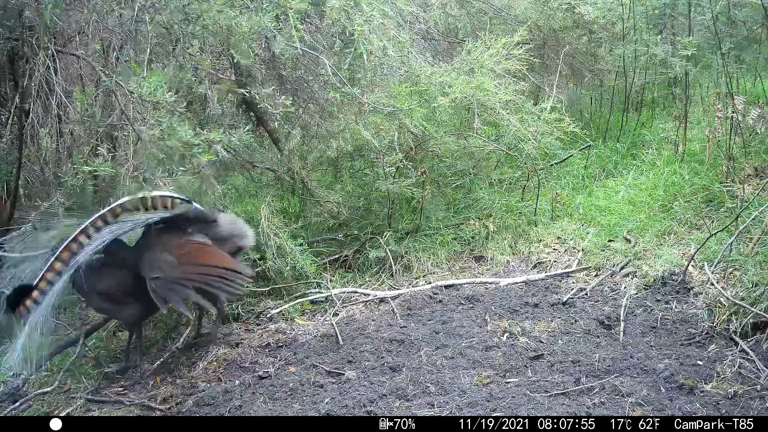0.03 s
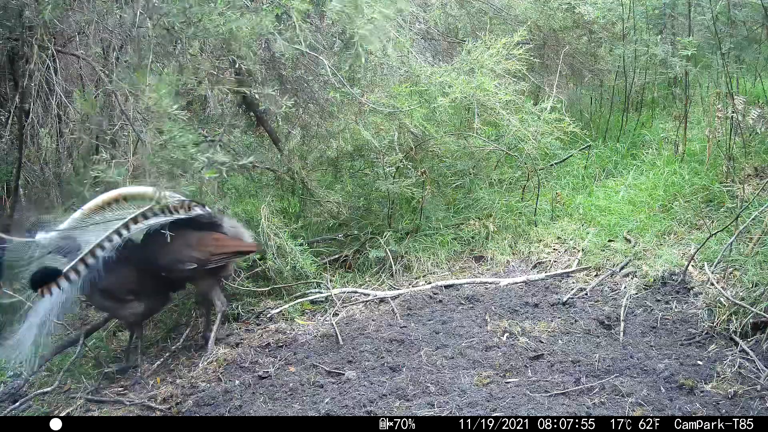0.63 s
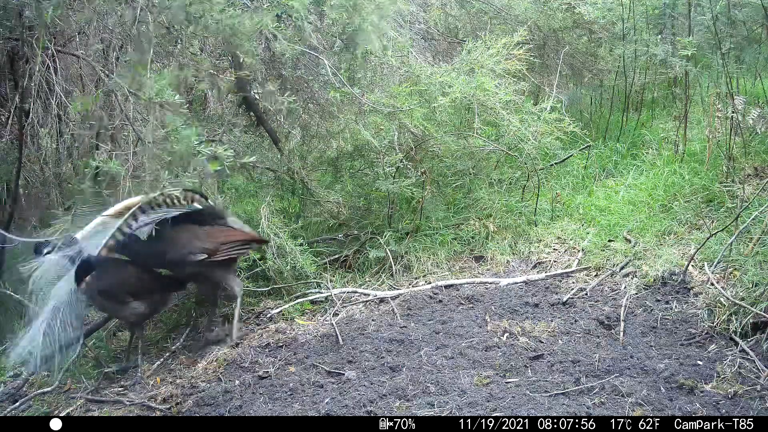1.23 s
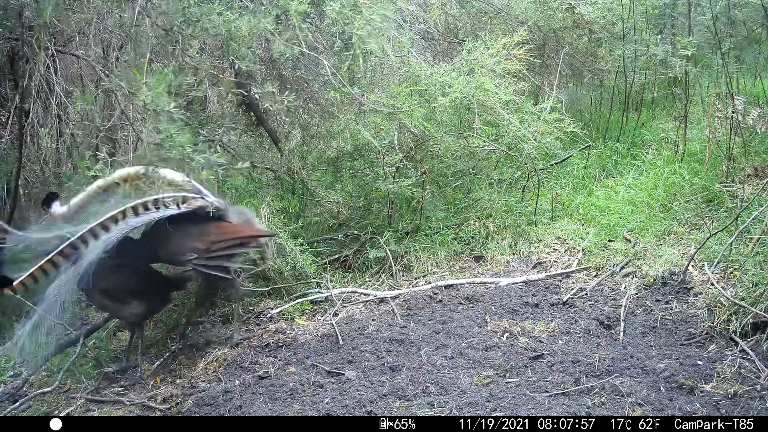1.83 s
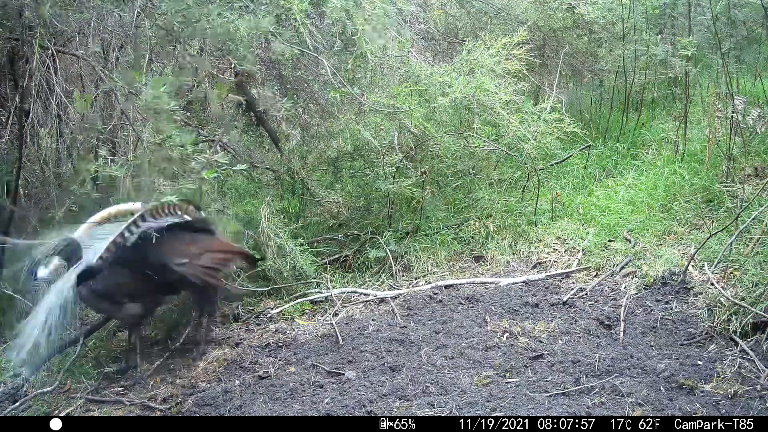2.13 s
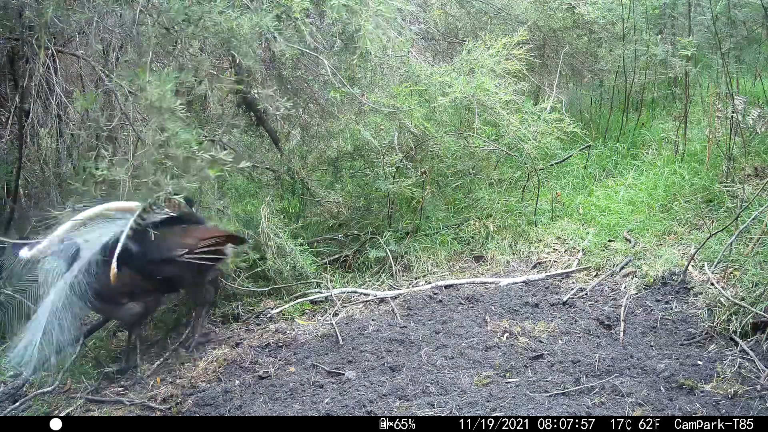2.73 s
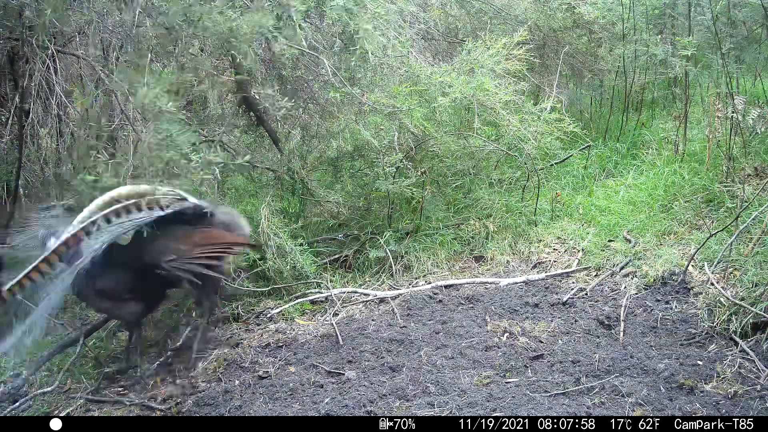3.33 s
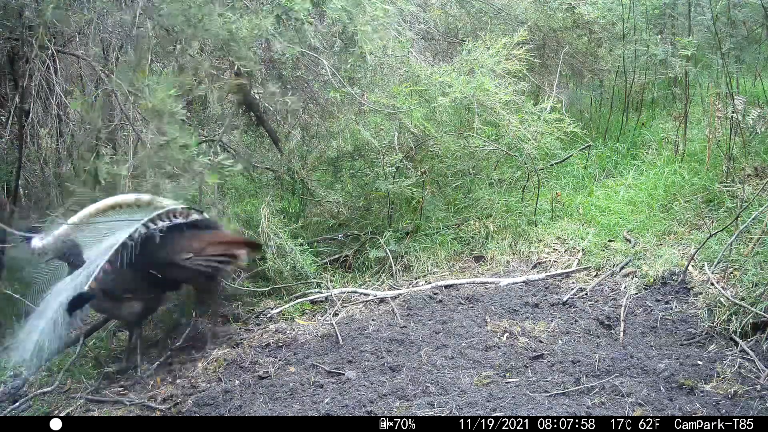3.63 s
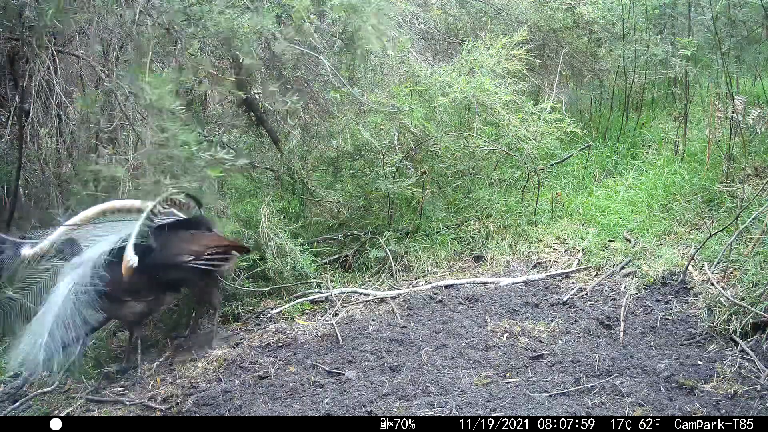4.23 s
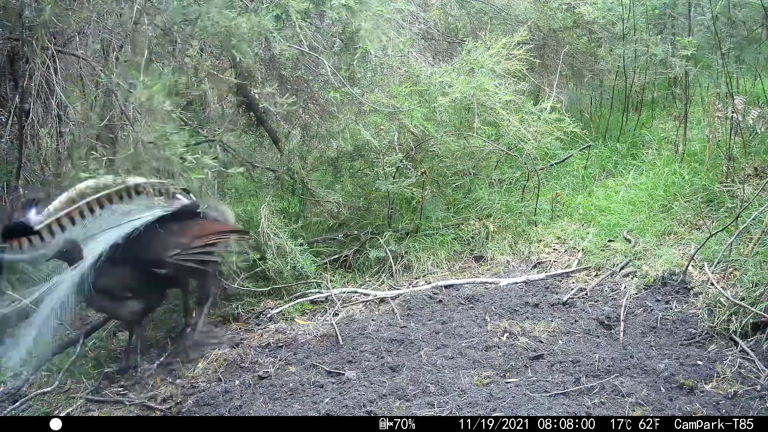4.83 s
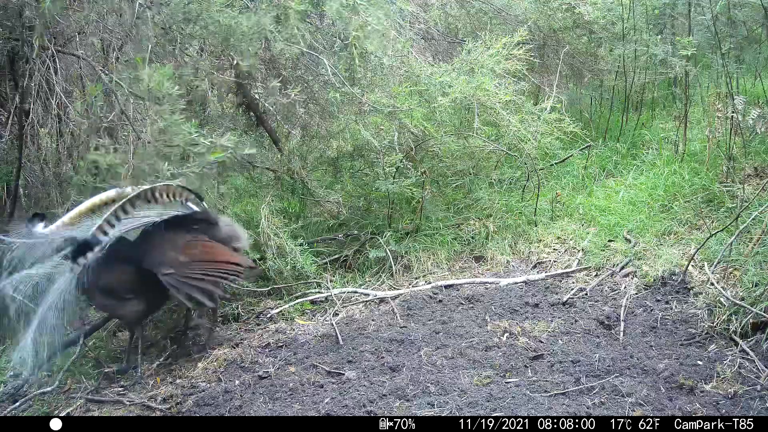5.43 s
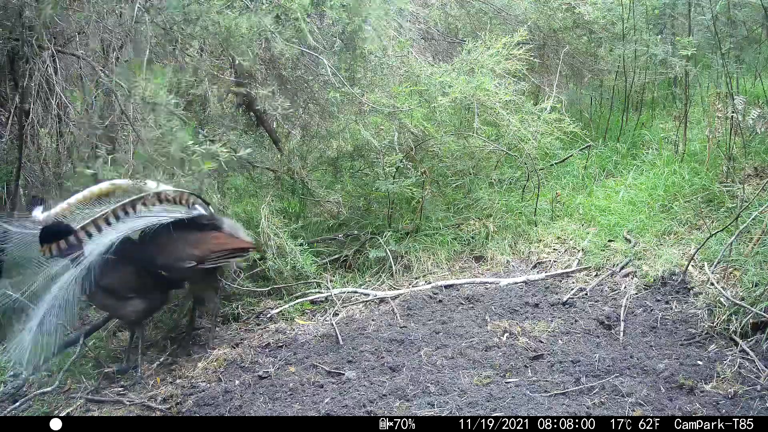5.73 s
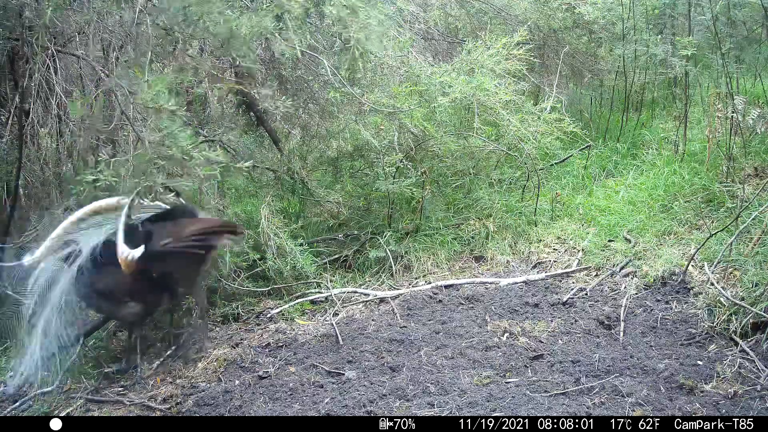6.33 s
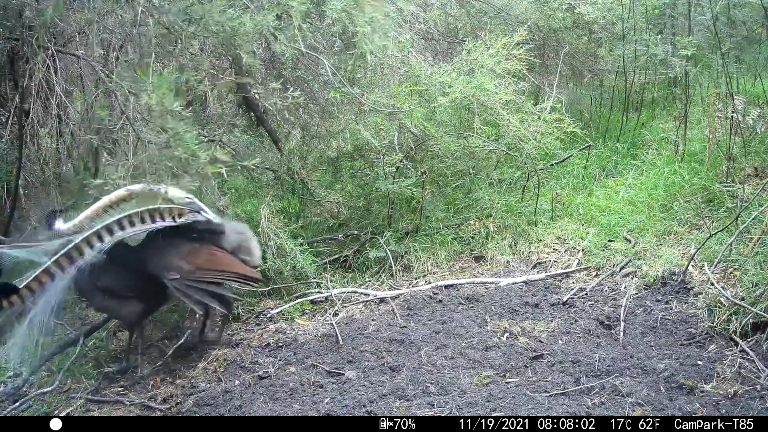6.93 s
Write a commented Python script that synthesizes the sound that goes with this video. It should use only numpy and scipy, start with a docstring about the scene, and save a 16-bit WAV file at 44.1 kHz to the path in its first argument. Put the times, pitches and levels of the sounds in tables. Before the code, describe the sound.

A lyrebird close by sings buzzing zaps, then alternates hollow knocks, dry clacks and whirrs with loud yelping trills in quiet scrub.

```python
"""A loud trill opens the scene, then five buzzing zaps: a lyrebird displays in scrub, close to a small
microphone. Both sides of its syrinx sound in a zap, a warbling high voice over a low whistle. It then
alternates knocks, dry clacks and whirrs (pulse trains filtered by the throat, all in one rhythm) with a
loud note-yelp-trill call; zaps and calls die away in a throbbing rasp. A small bird whistles further
off over faint air. Twigs and trunks scatter the song, and the loudest notes overload the microphone."""
import sys
import numpy as np
from scipy import signal
from scipy.fft import rfft, irfft
from scipy.io import wavfile
from scipy.ndimage import uniform_filter1d, minimum_filter1d

SR = 44100
rng = np.random.default_rng(int(sys.argv[2]) if len(sys.argv) > 2 else 0)


def to_wav(s):
    """Save 16-bit WAV."""
    ch = np.atleast_2d(s).T  # columns
    pcm = np.round(np.clip(ch, -1, 1) * 32767)  # PCM
    wavfile.write(sys.argv[1], SR, pcm.astype(np.int16))


N = 312228

# spectra of the background air and of the throat in each kind of sound: f/Hz, level/dB
AIR_COLOUR = [(20, -6.5), (40, -7.5), (100, -6), (200, -4.5), (450, -12), (900, -17), (2000, -20),
              (5000, -17.5), (8000, -22), (10000, -25.5), (14000, -28.5), (15500, -44.5)]
WHIRR_COLOUR = [(500, -18.5), (1250, -4.5), (2400, -24), (3500, -11.5), (4700, 5), (5800, 0), (7200, -6.5),
                (8300, -14.5), (9500, -35.5)]
CLACK_COLOUR = [(250, 33), (700, -25), (1250, 9), (1800, -6.5), (2600, -15), (3700, -1.5), (5600, -4),
                (7000, -12.5), (8300, -33), (10000, -47)]
KNOCK_COLOUR = [(150, -16), (260, -20), (700, 9), (1300, 11.5), (2200, 3), (3500, 5.5), (5300, 13.5),
                (6500, -19), (8000, -27.5), (10000, -40)]
RASP_COLOUR = [(1900, -17.5), (2600, -4.5), (3500, 2), (4400, 1.5), (5400, 0), (6500, -12.5), (8000, -16),
               (10000, -23), (14500, -27.5), (15500, -43.5)]
ZAP_COLOUR = [(2000, -19), (2800, -6), (3500, -5), (4100, 1), (5200, -2), (5900, 4.5), (6700, -2),
              (7500, -4.5), (9000, -23), (14500, -36)]
# whistles of the small bird: t/s, length/s, starting f/Hz, final f/Hz, level/dB
FAR_WHISTLES = [(1.859, 0.061, 4500, 2880, -37), (3.126, 0.054, 3150, 3040, -46),
                (3.445, 0.046, 2990, 2887, -49.5), (4.334, 0.083, 4500, 2900, -43),
                (5.976, 0.071, 4450, 2830, -42), (6.041, 0.094, 3380, 3005, -46.5)]
# phrases of a deep knock and a pair of clacks: knock t/s, pair t/s, knock level/dB, snap level/dB,
# clack level/dB, whirr level/dB, puff level/dB, drop from first to second puff/dB
PHRASES = [(1.9408, 2.023, -17, -12.5, -18.5, -30.5, -43.5, 6),
           (2.948, 3.061, -19, -16.5, -20.5, -33.5, -37.5, 3.5),
           (3.389, 3.505, -21.5, -30.5, -19, -33.5, -42.5, 8.5),
           (4.446, 4.557, -17, -14, -18, -30, -37, 2.5), (4.8858, 5.0008, -18, -15, -17, -29, -41, 5.5),
           (6.003, 6.1161, -18, -19, -17, -27.5, -37, 3), (6.444, 6.56, -19.5, -26, -15.5, -27, -46, 6)]
# puffs after a pair: t/s from its second clack, t60/s
PAIR_PUFFS = [(.035, .07), (.068, 0.12), (.114, .17)]
# whirrs round a pair: t/s from its first clack, length/s, relative level/dB
PAIR_WHIRRS = [(-.034, .024, 0), (.007, .016, -1), (0.034, .014, 1.5)]
# hollow resonances of the throat after a knock: f/Hz, level/dB, t60/s
THROAT_MODES = [(252, -16, 0.057), (487.6, -11.5, 0.056), (701, -12, 0.063), (1242, -11.5, .05)]
# zaps: t/s, crack level/dB, buzz level/dB, whistle level/dB
ZAPS = [(0.4513, -8, -3.5, -3), (.669, 1, 2.5, -0.5), (.889, 3.5, 2.5, -0.5), (1.1086, 2, 3.5, -0.5),
        (1.3288, 1.5, 3, -1)]
# high voice of a zap: t/s from its start, centre f/Hz, warble f/Hz, level/dB
ZAP_BUZZ = [(.001, 4642, 185, -15), (.005, 4360, 186.2, -12.5), (.018, 4167, 187.3, -16.5),
            (.035, 4050, 159.5, -23), (.06, 4000, 148, -26.5), (.1, 4030, 148, -29), (.118, 4250, 189, -26),
            (.135, 5190, 204, -33.5)]
# pitch contours of the parts of a zap and of a loud call: t/s within the part, f/Hz, level/dB
ZAP_CRACK = [(-.002, 915, -31), (-.0006, 1424, -17), (0, 2294, -4), (.0007, 4300, -4), (.0016, 5300, -38)]
ZAP_WHISTLE = [(.004, 1152, -19), (.02, 755, -21), (.035, 626.4, -34.5), (.06, 713, -26.5), (.09, 794, -28),
               (.11, 1049, -27), (.124, 1550, -16.5), (.134, 2300, -18.5), (.138, 2310, -72)]
CALL_NOTE = [(0, 1435, -31.5), (.002, 1442, -14.5), (.007, 1447, -9), (.014, 1486, -6), (.02, 1470, -8),
             (.023, 1437, -15.5), (.027, 1504, -33.5)]
CALL_YELP = [(-.005, 3010, -29), (-.003, 2996, -1.5), (-.0005, 3038, 6.5), (.0025, 2960, -9.5),
             (.005, 2816, -6.5), (.008, 3000, 0), (.0105, 3087, -10.5), (.013, 3090, -38)]
TRILL_PIP = [(-.0036, 2334, -28), (-.0018, 1974, -9.5), (0, 2140, 0.5), (.0014, 1950, -5.5),
             (.0028, 1540, -19), (.0039, 2030, -16.5), (.0065, 2150, -32.5)]
TRILL_SLUR = [(.006, 1640, -29), (.012, 1400, -24.5), (.022, 1192, -25), (.027, 1000, -44),
              (.031, 900, -78.5)]
# loud calls, the first already under way: yelp t/s, last pip t/s, pitch ratio, yelp level/dB,
# rasp level/dB
LOUD_CALLS = [(-.0367, 0.0686, 1, 3, -34.5), (2.3407, 2.4459, 1.013, 4.5, -34.5),
              (3.8251, 3.9264, 1, 3, -34), (5.3212, 5.4247, 1.016, 2, -33),
              (6.8779, 6.983, 1.009, 1.5, -36)]

LEAD_S, PAIR_GAP_S = .052, .0556  # from lead clack to knock; between the clacks of a pair


def undb(db):
    """Amplitude ratio of a level in decibels."""
    return 10 ** (np.asarray(db) / 20)


def clock(length):
    """Sample times over a length in seconds."""
    return np.arange(max(int(length * SR), 8)) / SR


def add(out, s, x):
    """Superposition: x adds to out from time s."""
    i = int(round(s * SR))
    x = x[max(-i, 0):max(N - i, 0)]
    out[max(i, 0):max(i, 0) + len(x)] += x


def curves(table):
    """Linear interpolation: sample times, then each column of a table."""
    s, *columns = np.transpose(table)
    t = s[0] + clock(s[-1] - s[0])
    return [t] + [np.interp(t, s, c) for c in columns]


def gain_at(hz, colour):
    """Frequency response of a spectrum (f/Hz, level/dB), interpolated in log frequency."""
    f, db = np.transpose(colour)
    return undb(np.interp(np.log(hz + 1), np.log(f), db))


def coloured(x, colour):
    """Linear filtering: the spectrum of x is multiplied by a frequency response."""
    return irfft(rfft(x) * gain_at(np.fft.rfftfreq(len(x), 1 / SR), colour), len(x))


def noise(colour, size):
    """Filtered Gaussian noise of rms 1."""
    x = coloured(rng.standard_normal(size), colour)
    return x / x.std()


def wander(t, rate):
    """Random modulation of spread near 1, with rate new values a second."""
    u = (t - t[0]) * rate
    points = rng.standard_normal(int(u[-1]) + 2)
    return 1.2 * np.interp(u, np.arange(len(points)), points)


def turn(hz):
    """Phase as the time integral of frequency."""
    return 2 * np.pi * np.cumsum(hz) / SR


def gate(t, edge):
    """Trapezoidal envelope with ramps of edge seconds."""
    return np.clip(np.minimum(t - t[0], t[-1] - t) / edge, 0, 1)


def tone(hz, overtones_db):
    """Periodic vibration of a membrane: a fundamental and its harmonics."""
    phase = turn(hz)
    overtones = sum(undb(db) * np.sin((k + 2) * phase) for k, db in enumerate(overtones_db))
    return np.sin(phase) + overtones


def add_note(out, s, shape, db, overtones_db, ratio=1, rough=.002, hiss_db=-70):
    """Frequency jitter roughens a note sung along a contour at time s; air hisses with it."""
    t, hz, level_db = curves(shape)
    voice = tone(hz * ratio * (1 + rough * wander(t, 2500)), overtones_db)
    hiss = undb(hiss_db) * noise([(1000, -25), (4000, -.5), (8000, -2.5), (14500, -7)], len(t))
    add(out, s + t[0], undb(db + level_db) * gate(t, .00024) * (voice + hiss))


def pulses(t, hz, colour, fade_db_s=0, fade_db_s_per_hz=0, smear=3.14, count=40):
    """Source and filter: the throat weights and delays the harmonics of syrinx pulses, smearing them."""
    k = np.arange(1, count + 1)[:, None]
    weight = gain_at(k * hz, colour) * (k * hz < SR / 4)
    lag = smear * np.cumsum(.5 * rng.standard_normal((count, 1)), axis=0)
    decay = undb(-t * (fade_db_s + fade_db_s_per_hz * k * hz))
    harmonics = weight * decay * np.sin(k * (turn(hz) - 1.4) + lag)
    return gate(t, .00036) * harmonics.sum(0) / weight.sum(0)


def air(db=-58):
    """Ambient noise: faint, broadband and slowly drifting in level."""
    return noise(AIR_COLOUR, N) * undb(db + 1.1 * wander(clock(8)[:N], 3.1))


def scrub(x, early_db=-25, early_t60=.076, late_db=-27, late_t60=.67):
    """Reverberation: twigs scatter the sound at once; trunks further off give a faint long tail."""
    t = clock(.87)
    colour = [(100, -7.5), (1400, 4), (2100, 7.5), (3000, 3.5), (6000, 7), (8400, 5),
              (10000, -1.5), (14000, -9.5)]
    response = 0
    for db, t60 in ((early_db, early_t60), (late_db, late_t60)):
        tail = noise(colour, len(t)) * undb(-60 * t / t60) * np.clip(t / .00083, 0, 1)
        response = response + undb(db) * tail / np.linalg.norm(tail)
    return x + signal.fftconvolve(x, response)[:N]


def small_bird(direct_db=-8, scattered_db=-7, t60=.23):
    """Scattering in the bushes smears the thin falling whistles of a distant bird."""
    direct = np.zeros(N)
    for s, length, from_hz, to_hz, db in FAR_WHISTLES:
        t = clock(length)
        hz = from_hz * (to_hz / from_hz) ** (t / length) * (1 + .02 * wander(t, 400))
        add(direct, s, undb(db) * gate(t, .015) * np.sin(turn(hz)))
    t = clock(.25)
    leaves = rng.standard_normal(len(t)) * undb(-60 * t / t60)
    scattered = signal.fftconvolve(direct, leaves / np.linalg.norm(leaves))[:N]
    return undb(direct_db) * direct + undb(scattered_db) * scattered


def puffs():
    """Exponentially decaying noise bursts follow each pair of clacks, their level dropping ever faster."""
    out = np.zeros(N)
    t = clock(.13)
    colour = [(400, -18.5), (1400, -3.5), (2500, -12.5), (3700, -3), (5100, -.5), (6500, -18),
              (9000, -27.5), (14000, -42.5)]
    for _, pair_s, *_, db, drop_db in PHRASES:
        for k, (after, t60) in enumerate(PAIR_PUFFS):
            envelope = undb(db - drop_db * k ** 2 - 60 * t / t60) * gate(t, .0015)
            add(out, pair_s + PAIR_GAP_S + after, envelope * noise(colour, len(t)))
    return out


def whirr(length, pulse_hz=550):
    """High formants turn a pulse train into a thin buzz; the pulse rate sags in the middle."""
    t = clock(length)
    hz = pulse_hz * (1 + .08 * np.cos(2 * np.pi * t / length) + .03 * wander(t, 150))
    buzz = pulses(t, hz, WHIRR_COLOUR) + undb(-27.5) * noise(WHIRR_COLOUR, len(t))
    pressure_loss = undb(-4 * t / length)
    return pressure_loss * gate(t, .0014) * buzz


def whirrs(lead_delay_s=.006, lead_length_s=.035, lead_db=-4):
    """Pulse trains fill the gaps: a long soft one before each knock, three short ones round the pair."""
    out = np.zeros(N)
    for knock_s, pair_s, *_, db, _, _ in PHRASES:
        add(out, knock_s - LEAD_S + lead_delay_s, undb(db + lead_db) * whirr(lead_length_s))
        for after, length, relative_db in PAIR_WHIRRS:
            add(out, pair_s + after, undb(db + relative_db) * whirr(length))
    return out


def clack(t60):
    """Jitter and a noise burst make a damped pulse train gritty; a filter thins its bass."""
    t = clock(.12)
    hz = (380 + 220 * np.exp(-t / .03)) * np.exp(.12 * np.clip(wander(t, 900), -2, 2))
    body = pulses(t, hz, CLACK_COLOUR, fade_db_s=60 / t60, fade_db_s_per_hz=.19)
    grit = undb(-18.5 - 4300 * t) * gate(t, .00087) * noise(CLACK_COLOUR, len(t))
    return coloured(body + grit, [(80, -17), (300, 3), (800, -.5)])


def clacks(lead_db=-21.5, lead_t60=.03, first_db=-2.5, pair_t60=.079):
    """Damping sets the character: one dry clack before each knock, a ringing pair after it."""
    out = np.zeros(N)
    for knock_s, pair_s, _, _, db, *_ in PHRASES:
        add(out, knock_s - LEAD_S, undb(lead_db) * clack(lead_t60))
        add(out, pair_s, undb(db + first_db) * clack(pair_t60))
        add(out, pair_s + PAIR_GAP_S, undb(db) * clack(pair_t60))
    return out


def knocks(snap_delay_s=.0018, pulses_db=7.5):
    """Damped throat modes ring hollow under a slowing, darkening pulse train and a falling snap."""
    out = np.zeros(N)
    t = clock(.12)
    snap = [(-.0007, 6500, -24.5), (-.0001, 5330, -8), (.0003, 3835, 2), (.0009, 3100, -9),
            (.002, 2710, -60)]  # t/s, f/Hz, level/dB
    for s, _, db, snap_db, *_ in PHRASES:
        hz = (240 + 280 * np.exp(-t / .0045)) * (1 + .032 * wander(t, 550))
        body = undb(pulses_db) * pulses(t, hz, KNOCK_COLOUR, fade_db_s=1900, fade_db_s_per_hz=.27)
        # the resonances start a little high and sink as the throat relaxes
        relax = (1 + .18 * np.exp(-t / .008)) * (1 + .02 * rng.standard_normal())
        hollow = sum(undb(mode_db - 60 * t / t60) * np.sin(turn(mode_hz * relax))
                     for mode_hz, mode_db, t60 in THROAT_MODES)
        add(out, s, undb(db) * (body + gate(t, .006) * hollow))
        add_note(out, s + snap_delay_s, snap, snap_db, overtones_db=[-38], rough=.034)
    return out


def rasp(length, fade_db_s, throb_hz, peak_s, high_depth_db=3, low_depth_db=6.5, low_db=-4):
    """Amplitude modulation: two hoarse voices throb as they fade; the low one scoops up each time."""
    t = clock(length)
    cycle = 2 * np.pi * throb_hz * (t - peak_s)
    throb = np.cos(cycle) * np.clip(t / .039, 0, 1)
    flutter = turn(200 * (1 + .23 * wander(t, 250)))
    high = noise(RASP_COLOUR, len(t)) * undb(high_depth_db * throb) * (1 + .083 * np.sin(flutter))
    low_hz = 1450 + 180 * np.sin(flutter) + 480 * wander(t, 2600) + 340 * np.sin(cycle)
    throat = [(200, -35), (500, -6.5), (800, -2), (1600, 6), (2600, -6)]
    low = coloured(tone(low_hz, overtones_db=[-14]), throat)
    low *= undb(low_db + low_depth_db * (throb - .2) + 1.2 * wander(t, 850))
    return undb(-fade_db_s * t) * gate(t, .0043) * (high + low)


def rasps(zap_delay_s=.13, zap_db=-24.5, pause_s=.0014, trill_delay_s=.026):
    """Exponential decay: every zap and every trill dies away in a rasp."""
    out = np.zeros(N)
    starts = [zap[0] for zap in ZAPS]
    for zap_s, next_s in zip(starts, starts[1:] + [np.inf]):
        s = zap_s + zap_delay_s
        length = min(.35, next_s - pause_s - s)  # the bird falls silent just before the next zap
        tail = rasp(length, fade_db_s=77, throb_hz=28, peak_s=.045, low_depth_db=5.5, low_db=-5.5)
        add(out, s, undb(zap_db) * tail)
    for _, last_s, *_, db in LOUD_CALLS:
        tail = rasp(.42, fade_db_s=52, throb_hz=27.05, peak_s=.028)
        add(out, last_s + trill_delay_s, undb(db) * tail)
    return out


def add_buzz(out, s, db, swing_hz=1100, octave_db=-7, hiss_db=-25):
    """Fast frequency modulation, narrowing with time, makes the high voice of a zap buzz."""
    t, centre_hz, rate_hz, level_db = curves(ZAP_BUZZ)
    warble = turn(rate_hz * (1 + .035 * wander(t, 150))) - 1.2
    narrowing = 1 - np.clip(t / .31, 0, .38)
    hz = centre_hz + swing_hz * narrowing * np.cos(warble) + 130 * wander(t, 2500)
    # as the pressure drops, the membrane sounds mostly on each downward stroke
    stroke = (1 + np.clip(t / .11, 0, .8) * np.sin(warble - 1.05)) * undb(1.9 * wander(t, 500))
    buzz = coloured(tone(hz, [octave_db]) * stroke, ZAP_COLOUR)
    hiss = noise([(2000, -23), (5000, 2.5), (9500, 9), (14500, -10)], len(t))
    sizzle = undb(hiss_db) * np.clip(t / .037, 0, 1) * hiss
    add(out, s + t[0], undb(db + level_db) * gate(t, .0025) * (buzz + sizzle))


def add_whistle(out, s, db):
    """Throat resonances shape the low voice of a zap as its pitch dips and rises."""
    t, hz, level_db = curves(ZAP_WHISTLE)
    throat = [(600, -4), (850, -5.5), (1350, 0), (1600, -6), (2400, -4.5), (3500, -13), (6000, -19)]
    phase = turn(hz * (1 + .047 * wander(t, 1600)))
    fundamental = gain_at(hz, throat) * np.sin(phase) * np.clip(t / .11, 0, 1)
    # the octave is strong early on and drops out before the final rise
    octave_gain = undb(np.interp(t, [0, .025, .05, .1], [-10, -1.5, -3, -23]))
    octave = octave_gain * gain_at(2 * hz, throat) * np.sin(2 * phase)
    # the rise is pressed and gains bright overtones
    pressed = np.clip((t - .105) / .023, 0, 1) * undb(-14.5) * (np.sin(2 * phase) + np.sin(3 * phase))
    add(out, s + t[0], undb(db + level_db) * gate(t, .002) * (fundamental + octave + pressed))


def zaps():
    """Biphonation: after a cracking upsweep, the two sides of the syrinx sing separate voices."""
    out = np.zeros(N)
    for s, crack_db, buzz_db, whistle_db in ZAPS:
        add_note(out, s, ZAP_CRACK, crack_db, overtones_db=[-20], rough=.1, hiss_db=-22)
        add_buzz(out, s, buzz_db)
        add_whistle(out, s, whistle_db)
    return out


def add_trill(out, first_s, last_s, count=6, hurry=.11, sag=.009):
    """Repeated frequency sweeps: pips hurry and sink in pitch over a thin sizzle; the last slurs down."""
    u = np.linspace(0, 1, count)
    pip_times = first_s + (last_s - first_s) * (u + hurry * u * (1 - u))
    for k, s in enumerate(pip_times):
        db = 2.3 + 1.2 * rng.standard_normal()
        ratio = (1.015 - sag * k) * (1 + .011 * rng.standard_normal())
        add_note(out, s, TRILL_PIP, db, overtones_db=[-18, -18.5, -26, -27, -44],
                 ratio=ratio, rough=.0067, hiss_db=-26)
    t = clock(last_s - first_s + .023)
    colour = [(1000, -22.5), (5000, -3), (8500, -1.5), (10000, -6), (14000, -5), (15500, -26.5)]
    sizzle = undb(-38) * gate(t, .01223) * noise(colour, len(t))
    add(out, first_s - .005, sizzle)
    add_note(out, last_s, TRILL_SLUR, 0, overtones_db=[-24, -20.5, -20, -14.5, -18.5],
             rough=.026, hiss_db=-16.5)


def loud_calls(note_lead_s=.045, trill_delay_s=.0286):
    """Membrane vibration gives a nearly pure note, a two-humped yelp an octave up, and a trill."""
    out = np.zeros(N)
    for yelp_s, last_s, ratio, db, _ in LOUD_CALLS:
        add_note(out, yelp_s - note_lead_s, CALL_NOTE, .2, overtones_db=[-35.5, -31, -49, -41.5],
                 ratio=ratio, rough=.009, hiss_db=-61.5)
        add_note(out, yelp_s, CALL_YELP, db, overtones_db=[-16, -41, -41, -39.5],
                 ratio=ratio, rough=.0082, hiss_db=-38)
        add_trill(out, yelp_s + trill_delay_s, last_s)
    return out


def scene():
    """Superposition of the birds, their reverberation in the scrub and the air, in one channel."""
    birds = zaps() + loud_calls() + rasps() + knocks() + clacks() + whirrs() + puffs() + small_bird()
    return (scrub(birds) + air())[None]


def record(dry, thump=.12, top_hz=15500):
    """Overload: a fast limiter holds loud notes at full scale; driven far past it, the microphone thumps."""
    peaks = uniform_filter1d(-minimum_filter1d(-np.abs(dry), size=45), size=45)
    held = dry / np.maximum(peaks / 1.06, 1)
    excess = np.maximum(np.abs(dry) - 1.15, 0)
    overload = signal.sosfilt(signal.butter(2, 260, fs=SR, output="sos"), excess)
    clipped = np.clip(held + thump * overload, -1, 1)
    return signal.sosfilt(signal.ellip(8, .2, 70, top_hz, fs=SR, output="sos"), clipped)


dry = scene()
out = record(dry)
to_wav(out)
```